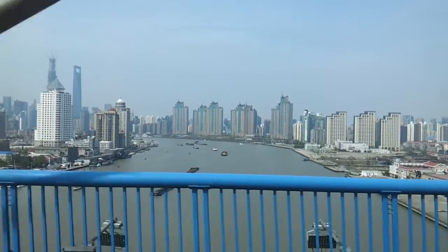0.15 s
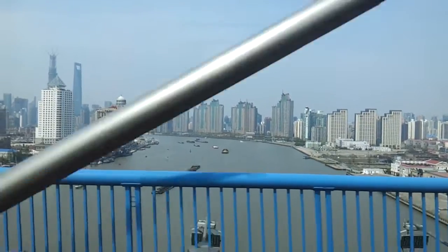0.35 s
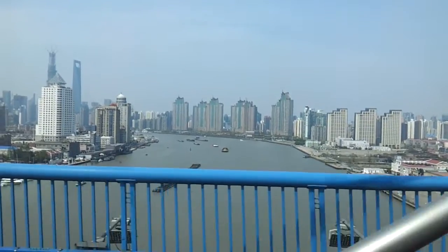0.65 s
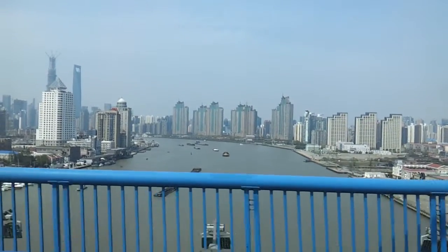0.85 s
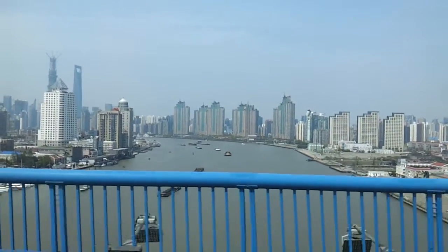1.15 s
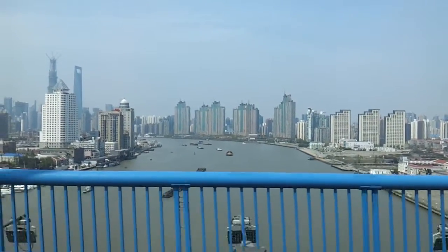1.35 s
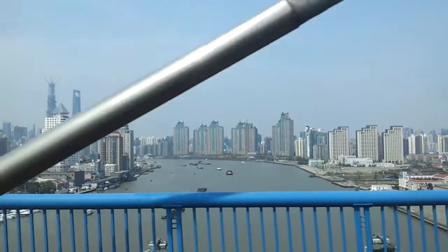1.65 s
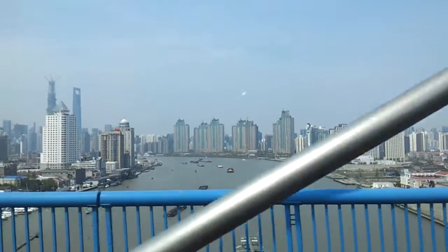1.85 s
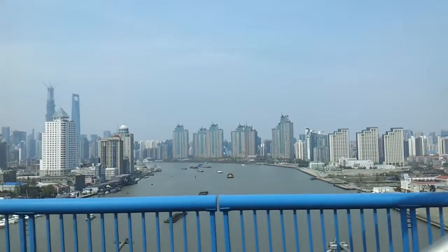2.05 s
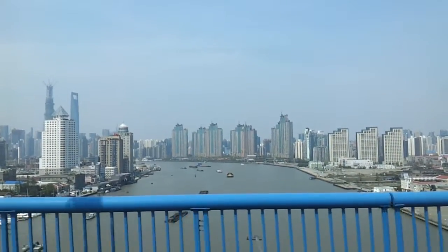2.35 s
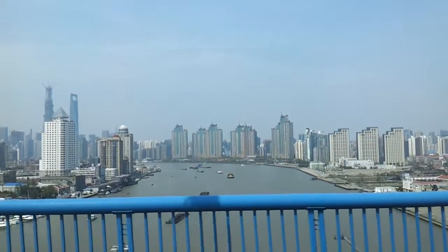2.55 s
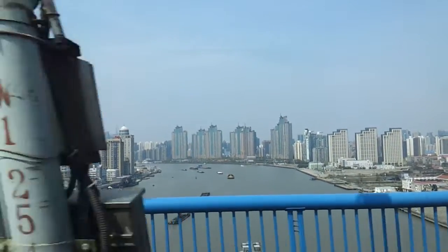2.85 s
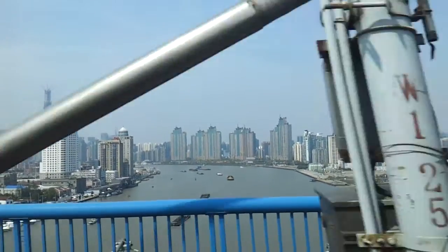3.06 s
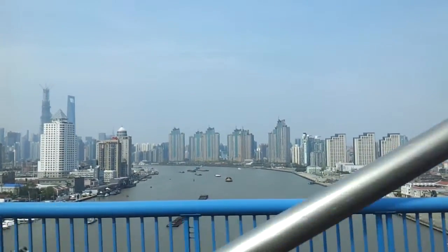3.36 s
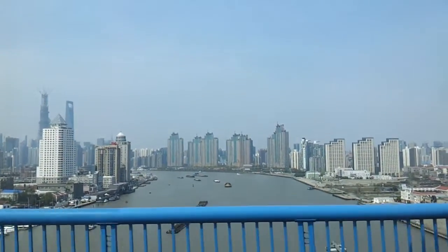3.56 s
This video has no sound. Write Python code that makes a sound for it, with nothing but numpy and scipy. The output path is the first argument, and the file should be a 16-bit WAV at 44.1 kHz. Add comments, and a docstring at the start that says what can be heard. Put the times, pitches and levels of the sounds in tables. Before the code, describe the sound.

A vehicle rumbles steadily across a bridge, heard from inside with tyre roar and soft thumps. Loose trim clicks, rubs and squeaks close by, thin high whines come and go, and a panel buzzes faintly near the end.

```python
"""A deep body rumble and tyre roar, heard on a stereo pair inside a vehicle crossing a long bridge.
The speed is steady; cabin resonances colour the road noise, and uneven paving brings soft thumps.
Close to the microphones loose trim rubs, clicks and squeaks, and thin high whines come and go.
Towards the end a fitting pings and a loose panel starts to buzz."""
import sys
import numpy as np
from scipy import signal
from scipy.fft import rfft, irfft
from scipy.io import wavfile
from scipy.ndimage import uniform_filter1d

SR = 44100
rng = np.random.default_rng(int(sys.argv[2]) if len(sys.argv) > 2 else 0)


def inscribe(sig):
    """Save sig as 16-bit PCM at rate SR to the path in sys.argv[1].

    A 1-D sig is mono; a 2-D sig holds one channel per row.
    Samples are clipped to [-1, 1] before scaling.
    """
    pcm = np.round(np.clip(np.atleast_2d(sig).T, -1, 1) * 32767)
    wavfile.write(sys.argv[1], SR, pcm.astype(np.int16))


N = 164052
T = np.arange(N) / SR
HZ = np.maximum(np.fft.rfftfreq(N, 1 / SR), 1)


def from_db(db):
    """Decibels to gain."""
    return 10 ** (np.asarray(db) / 20)


def rms_one(x):
    """Scale to unit power."""
    return x / np.sqrt(np.mean(x ** 2) + 1e-20)


def evened(x, window_s):
    """Stereo noise held at unit power over a sliding window."""
    power = uniform_filter1d(np.mean(x ** 2, axis=0), size=int(SR * window_s))
    return x / np.sqrt(power + 1e-12)


def in_time(rows):
    """Each column after time_s, interpolated sample by sample."""
    time_s, *columns = np.transpose(rows)
    return [np.interp(T, time_s, column) for column in columns]


def at_hz(points):
    """A table read on a log-frequency axis."""
    hz, value = np.transpose(points)
    return np.interp(np.log(HZ), np.log(hz), value)


def pan(left_db):
    """Constant-power gains, the left microphone louder than the right by left_db."""
    return rms_one(from_db(np.array([[left_db], [-left_db]]) / 2))


def drift(rate_hz):
    """A random wander of unit spread, mostly slower than rate_hz."""
    return rms_one(irfft(rfft(rng.standard_normal(N)) / (1 + (HZ / rate_hz) ** 2), N))


def wobble(width_hz):
    """Random strength and phase of an unsteady tone, different at each microphone."""
    return np.array([drift(width_hz) + 1j * drift(width_hz) for _ in range(2)])


def swell(start_s, length_s):
    """A rounded rise and fall."""
    return np.sqrt(np.abs(np.sin(np.pi * np.clip((T - start_s) / length_s, 0, 1))))


def struck(force, modes, pitch_ratio=1):
    """A force rings damped modes of alternating sign, each frequency scaled by pitch_ratio."""
    out = 0
    for k, (hz, db, t60_s) in enumerate(modes):
        radius, angle = from_db(-60 / (t60_s * SR)), 2 * np.pi * hz * pitch_ratio / SR
        feedback = [1, -2 * radius * np.cos(angle), radius ** 2]
        out += (-1) ** k * from_db(db) * signal.lfilter([0, np.sin(angle)], feedback, force + 1e-18)
    return out


def cabin_noise(spectrum):
    """Noise through the cabin resonances to the pair: alike in the bass, diffuse in the treble."""
    # cabin resonances: centre_hz, width_hz, boost_db
    resonances = [(107, 19, 1.5), (265, 29, 1.5), (334, 19, 5), (394.6, 22, 4), (490, 44, 4),
                  (936, 32, 3.5), (1010, 21, 5.5), (1270, 32, 1), (1548, 92, 1), (2720, 58, 6),
                  (2950, 74, 3.5), (4840, 47, 3)]
    # likeness of the two microphones: frequency_hz, coherence (0-1)
    likeness = [(30, 0.99), (150, 0.98), (270, 0.96), (500, 0.8), (750, 0.66), (1100, 0.33), (1500, 0.15),
                (2500, 0.18), (5000, 0.088), (12000, .1)]
    # level of left over right: frequency_hz, left_db
    balance = [(60, 1.5), (120, 1.5), (250, .3), (650, -1.2), (1000, 4), (1400, 3.5), (1900, -0.5),
               (2600, 3.5), (4400, 2.5), (8000, 0)]
    # phase of left ahead of right: frequency_hz, lead_rad
    lead = [(100, 0), (500, 0.3), (750, 0.37), (1100, 1.5), (1400, 3), (1700, 6.5), (2300, 8), (3500, 8)]
    mid, side = rfft(rng.standard_normal((2, N)))
    alike, signs = np.clip(at_hz(likeness), 0, 1), np.array([[1], [-1]])
    pair = np.sqrt(1 + alike) * mid + signs * np.sqrt(1 - alike) * side
    placement = from_db(signs * at_hz(balance) / 2) * np.exp(.5j * signs * at_hz(lead))
    peaks_db = sum(db / (1 + (2 * (HZ - hz) / width) ** 2) for hz, width, db in resonances)
    return rms_one(irfft(pair * placement * from_db(at_hz(spectrum) + peaks_db), N))


def body_rumble():
    """The body shakes on its springs with fairly even force, under the slow sway."""
    # sway of the body: time_s, relative_db
    sway = [(0, -19.5), (.12, -14.5), (.34, -15), (.48, -22.5), (.62, -14.5), (.75, -21.5), (.85, -18),
            (1.02, -19), (1.35, -22.5), (1.75, -21.5), (2.0, -20), (2.11, -14), (2.33, -22), (2.53, -14),
            (2.62, -21), (2.71, -11.5), (2.82, -27), (3.02, -20), (3.3, -15.5), (3.6, -11.5), (3.72, -15.5)]
    # rumble spectrum: frequency_hz, density_db
    spectrum = [(2, -31.5), (6, -11.5), (12, 4.5), (22, 6.5), (32, 0.5), (45, -2.5), (60, -9), (85, -13.5),
                (140, -36.5), (300, -96.5), (3000, -130)]
    gain_db = 1.5
    return from_db(gain_db + in_time(sway)[0]) * evened(cabin_noise(spectrum), window_s=1 / 7)


def road():
    """Tyres drone with the roughness of the paving and roar above it; air hisses. Each flutters a little."""
    # spectra of the three layers: frequency_hz, density_db
    drone = [(20, -26), (45, 2.5), (70, 0.5), (100, 0.5), (150, -1.5), (200, -6.5), (235, -7), (270, -8),
             (305, -13), (340, -13), (450, -19), (620, -22.5), (850, -25.5), (1300, -30), (3000, -103.5),
             (10000, -110)]
    roar = [(350, -21.5), (650, -1), (850, -3), (1050, 0), (1170, 2), (1300, 2), (1550, -1), (1800, -7),
            (2080, -9.5), (2450, -4.5), (2800, -7), (3200, -6.5), (3900, -13.5), (5000, -25), (8000, -71),
            (14000, -72.5)]
    hiss = [(2500, -35.5), (4500, 7), (5400, 3.5), (6600, 9), (8000, 6), (9000, -8), (10500, -39),
            (16000, -38)]
    # their levels along the bridge: time_s, relative_db
    paving = [(0, -25.5), (.15, -23.5), (.32, -21), (.5, -22), (.62, -22), (1.16, -23), (1.45, -23.5),
              (1.72, -25), (1.9, -23), (2.35, -24), (2.7, -24), (2.85, -22), (3.05, -23.5), (3.35, -22),
              (3.72, -22)]
    roar_level = [(0, -34), (.8, -34.5), (1.2, -34.5), (1.6, -34.5), (2.1, -36), (2.5, -36), (2.9, -35.5),
                  (3.4, -34.5), (3.72, -35.5)]
    hiss_level = [(0, -56), (.6, -54), (1.2, -52.5), (1.5, -49), (1.9, -49.5), (2.1, -52.5), (2.6, -54),
                  (3.0, -51.5), (3.35, -58.5), (3.72, -48.5)]
    layers = [(drone, paving, 2, 1), (roar, roar_level, 0, 1), (hiss, hiss_level, 4, 1.3)]
    out = 0
    for spectrum, level, gain_db, flutter_db in layers:
        gain = from_db(gain_db + in_time(level)[0] + flutter_db * drift(rate_hz=16))
        out += gain * evened(cabin_noise(spectrum), window_s=1 / 7)
    return out


def jolts():
    """Each bump slaps the tyres and makes the panels boom briefly."""
    # uneven paving and a road joint: start_s, boom_db, slap_db, decay_s
    bumps = [(0.269, -24, -39, 0.07), (.8, -35, -30, 0.059), (2.778, -18.5, -25.5, 0.051),
             (2.841, -22, -34, 0.025), (3.146, -22, -30, 0.067)]
    # panel boom and tyre slap: frequency_hz, density_db
    boom_spectrum = [(40, -32), (90, -2.5), (150, 4.5), (200, 4), (280, 2), (380, -10), (600, -21),
                     (1600, -49), (8000, -90)]
    slap_spectrum = [(100, -20.5), (330, 2.5), (500, -3), (700, -5), (950, -0.5), (1400, -15), (3000, -32),
                     (10000, -73)]
    attack_s = .005
    boom, slap = 0, 0
    for start_s, boom_db, slap_db, decay_s in bumps:
        age = T - start_s
        force = np.clip(age / attack_s, 0, 1) * np.exp(-np.maximum(age - attack_s, 0) / decay_s)
        boom += from_db(boom_db) * force
        slap += from_db(slap_db) * force
    return boom * evened(cabin_noise(boom_spectrum), window_s=1 / 40) + slap * cabin_noise(slap_spectrum)


def thin_tone(curve, width_hz, flutter_db):
    """A thin tone that sets in and stops."""
    hz, db = in_time(curve)
    gate = uniform_filter1d(1.0 * ((T > curve[0][0]) & (T < curve[-1][0])), size=SR // 100)
    waver = signal.sosfilt(signal.butter(2, 2 * width_hz, fs=SR, output="sos"), wobble(width_hz))
    tone = (waver * np.exp(2j * np.pi * np.cumsum(hz) / SR)).real
    return gate * from_db(db + flutter_db * drift(rate_hz=25)) * tone


def high_whine():
    """To the left, a thin, very high whine with a weaker partner just below."""
    # a whine that wavers and jumps in pitch: time_s, pitch_hz, level_db
    main = [(.35, 13250, -64), (.53, 13200, -69), (.62, 13200, -95), (.67, 13310, -59), (.94, 13250, -61),
            (.955, 13250, -80), (.965, 14700, -60), (1.13, 14550, -60), (1.14, 13730, -54),
            (1.6, 13690, -49), (1.97, 13670, -45), (2.075, 13680, -63), (2.11, 13620, -46),
            (2.17, 13620, -45), (2.23, 13660, -58), (2.31, 13660, -50), (2.39, 13680, -53),
            (2.43, 13680, -80), (2.46, 13620, -47), (2.52, 13600, -62)]
    partner = [(time_s, hz * .963, db - 11) for time_s, hz, db in main]
    tones = sum(thin_tone(curve, width_hz=130, flutter_db=4.5) for curve in (main, partner))
    return pan(left_db=8.5) * tones


def trim_rubs():
    """Close by, one trim surface slides on another in short grainy strokes."""
    # slides: start_s, level_db, length_s, left_db, cutoff_hz
    slides = [(.39, -42, 0.043, -2, 8950), (0.799, -32.5, 0.033, -1.5, 9100),
              (2.135, -39.5, 0.04, -9, 8500), (2.336, -40.5, 0.062, -13, 14000),
              (2.39, -45, 0.091, -9, 12000), (2.746, -40, 0.16, 1, 9150), (2.7757, -26.5, 0.016, 0, 12900),
              (2.788, -31, 0.034, -1, 11700), (2.84, -42, 0.029, 2, 8500), (2.953, -41, 0.031, -6, 9000),
              (3.145, -35, 0.046, -33, 12000), (3.209, -40, 0.054, -16, 12000),
              (3.439, -40.5, 0.11, 15, 10500), (3.691, -42, 0.024, 11, 9600)]
    # friction spectrum: frequency_hz, density_db
    spectrum = [(700, -17), (2000, -11.5), (3800, -6.5), (5500, -3), (7000, 0), (8300, -1), (10000, -12),
                (11600, -16), (12800, -37), (16000, -40)]
    grain_db = 2.5
    friction = rms_one(cabin_noise(spectrum) * from_db(grain_db * drift(rate_hz=220)))
    out = 0
    for start_s, db, length_s, left_db, cutoff_hz in slides:
        dulled = signal.sosfilt(signal.butter(10, cutoff_hz, fs=SR, output="sos"), friction)
        out += from_db(db) * pan(left_db) * swell(start_s, length_s) * dulled
    return out


def cabin_thrums():
    """Ripples in the paving make a cabin resonance swell and hum for a moment."""
    # hums: start_s, pitch_hz, level_db, length_s
    hums = [(0.727, 258, -18, 0.057), (0.798, 240, -21, 0.069), (1.086, 244.5, -25.5, 0.097)]
    return sum(from_db(db) * swell(start_s, length_s) * np.sin(2 * np.pi * (hz * T + rng.random()))
               for start_s, hz, db, length_s in hums)


def trim_clicks():
    """A snap and a moment of grit ring the trim and its panel; the far microphone hears it later."""
    # snaps: start_s, crack_db, ring_db, knock_db, left_db, pitch_ratio, contact_s
    snaps = [(0.776, -20, -33, -50, -8, 1.07, .0004), (2.333, -21, -26.5, -19.5, -18, 1.1, 0.00048),
             (2.413, -40, -41, -40, -1, 1.0, 0.0007), (2.466, -39, -31, -33, 4, 0.77, 0.00069),
             (2.52, -45, -34, -33, 5, 0.8, .001), (2.676, -51, -34, -44, -10, 1.07, 0.0015),
             (2.9777, -32, -28.5, -15, -15, 1.1, 0.003), (3.119, -10.5, -26.5, -21, 4, 1.17, 0.00037),
             (3.1229, -9.5, -6.5, -20, 1.5, 0.98, 0.00085), (3.1376, -34, -35, -23, -13, 0.93, 0.00037),
             (3.167, -37, -25.5, -25, -24, 1.02, 0.0011), (3.545, -17, -21, -15.5, 6, 0.77, 0.00062),
             (3.5461, -12, -22, -16.5, -4, 0.99, 0.00036), (3.5463, -21, -12, -23, 7, 1.26, 0.0005)]
    # bright trim modes, before each snap's pitch_ratio, and dull modes of the panel behind, always sounded at
    # 0.91 of their base: base_hz, level_db, t60_s
    trim_modes = [(4700, -24, .0015), (5800, -5, 0.0043), (6390, 6.5, 0.0028), (8500, 1, 0.0018),
                  (9100, -28, .0015), (12600, -27, .002)]
    panel_modes = [(1210, -6, 0.0046), (1730, 0.5, 0.004), (2660, 0.5, 0.0022), (3260, -21, 0.0011),
                   (4240, -1, 0.00062)]
    far_lag_s, grit_db = .00015, 1
    out, t = np.zeros((2, N + SR)), T[:SR // 20]
    for start_s, crack_db, ring_db, knock_db, left_db, pitch_ratio, contact_s in snaps:
        far_side = int(left_db > 0)
        for side, gain in enumerate(pan(left_db)):
            grit = rng.standard_normal(len(t)) * (t < contact_s) / np.sqrt(contact_s * SR)
            force = (t == 0) + from_db(grit_db) * grit
            crack = from_db(crack_db) * force
            ring = from_db(ring_db) * struck(force, trim_modes, pitch_ratio)
            knock = from_db(knock_db) * struck(force, panel_modes, pitch_ratio=.91)
            start = int((start_s + far_lag_s * (side == far_side)) * SR)
            out[side, start:start + len(t)] += gain * (crack + ring + knock)
    return out[:, :N]


def trim_squeaks():
    """Loose trim near by on the left squeaks in narrow, fluttering tones."""
    # squeaks: start_s, pitch_hz, level_db, length_s
    squeaks = [(1.077, 1960, -44.5, .13), (1.822, 2955, -38, 0.064), (2.59, 1356, -35.5, 0.087)]
    tones = sum(from_db(db) * swell(start_s, length_s) * np.exp(2j * np.pi * hz * T)
                for start_s, hz, db, length_s in squeaks)
    return pan(left_db=7) * (wobble(width_hz=70) * tones).real


def lower_whine():
    """A second thin whine sounds for about a second, sinking slightly in pitch."""
    # course of the whine: time_s, pitch_hz, level_db
    curve = [(1.5, 8330, -66), (1.63, 8270, -51), (1.93, 8235, -46), (2.02, 8225, -50), (2.45, 8160, -50),
             (2.535, 8180, -45), (2.58, 8150, -62)]
    return thin_tone(curve, width_hz=55, flutter_db=1.5)


def fitting_ping():
    """A loose fitting on the left rings once."""
    # modes of the fitting: pitch_hz, level_db, t60_s
    modes = [(1261, -21, .048), (2910, -29, .015)]
    start_s = 2.566
    tap = 1.0 * (np.arange(N) == int(start_s * SR))
    return pan(left_db=7) * struck(tap, modes)


def panel_buzz():
    """A loose panel chatters as the shaking grows, and its modes whistle faintly."""
    # strength of the buzz: time_s, level_db
    level = [(2.6, -67), (2.85, -46), (3.05, -46.5), (3.2, -41.5), (3.38, -41), (3.55, -38), (3.72, -46.5)]
    # chatter spectrum: frequency_hz, density_db
    spectrum = [(700, -51), (1500, -37), (2300, -8), (2650, -1), (2850, 0), (3100, -4.5), (3500, -15.5),
                (4500, -42.5), (10000, -72)]
    # whistling panel modes: pitch_hz, width_hz, relative_db
    modes = [(2700, 35, -7), (2900, 70, -2)]
    grain_db = 2.5
    whistle = sum(from_db(db) * (wobble(width_hz) * np.exp(2j * np.pi * hz * T)).real
                  for hz, width_hz, db in modes)
    steady = evened(cabin_noise(spectrum) + whistle, window_s=1 / 20)
    chatter = steady * from_db(grain_db * drift(rate_hz=90))
    return from_db(in_time(level)[0]) * rms_one(chatter)


def cabin_reverb(x, t60_s, level_db):
    """A short dense tail from the cabin walls."""
    t = T[:SR // 4]
    tail = rng.standard_normal((2, len(t))) * from_db(-60 * t / t60_s)
    tail /= np.sqrt(np.sum(tail ** 2) / 2)
    return from_db(level_db) * signal.fftconvolve(x, tail, axes=1)[:, :N]


def scene():
    """Road noise all round, with the small sounds of the cabin close to the microphones."""
    snaps = trim_clicks() + fitting_ping()
    tones = lower_whine() + high_whine() + trim_squeaks()
    ride = body_rumble() + road() + jolts() + cabin_thrums() + panel_buzz()
    return ride + snaps + cabin_reverb(snaps, t60_s=.074, level_db=-29) + trim_rubs() + tones


def record(dry):
    """The sound fades briefly in and out, clips at full scale and loses its highest treble."""
    fade_s, stopband_hz = .004, 17600
    fade = np.clip(np.minimum(T, T[-1] - T) / fade_s, 0, 1)
    lowpass = signal.cheby2(12, 70, stopband_hz, fs=SR, output="sos")
    return signal.sosfilt(lowpass, np.clip(fade * dry, -1, 1))


dry = scene()
out = record(dry)
inscribe(out)
```